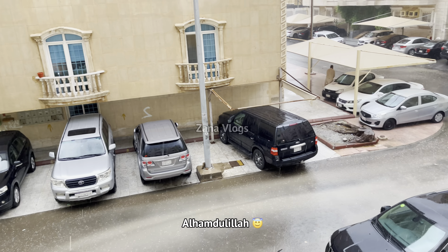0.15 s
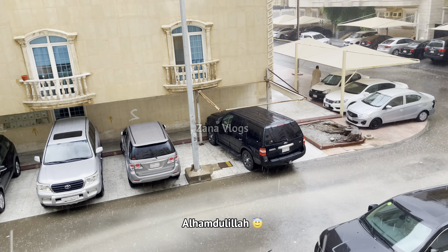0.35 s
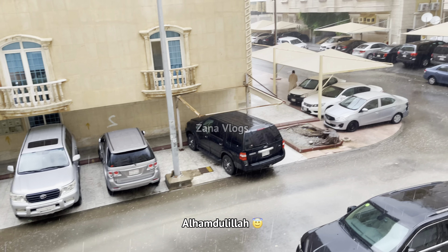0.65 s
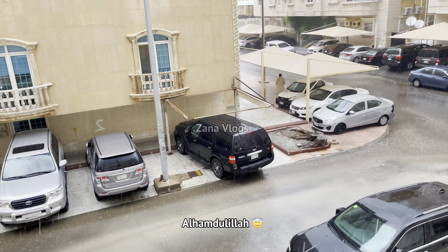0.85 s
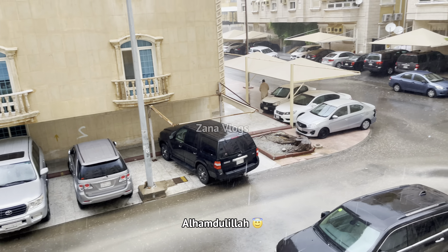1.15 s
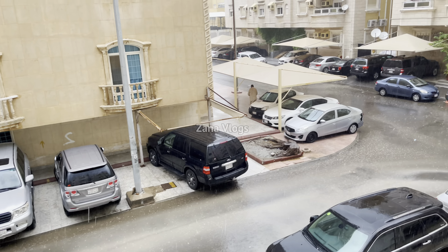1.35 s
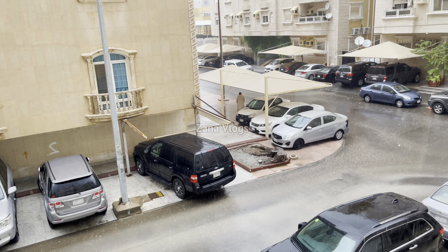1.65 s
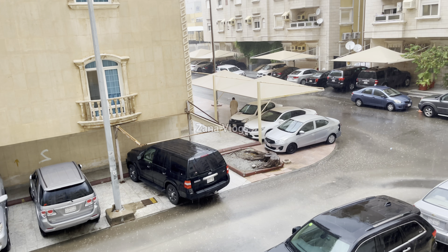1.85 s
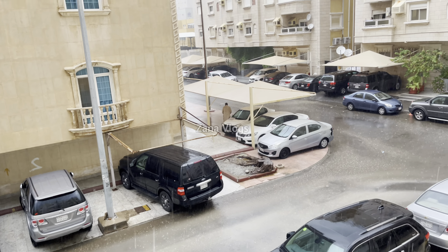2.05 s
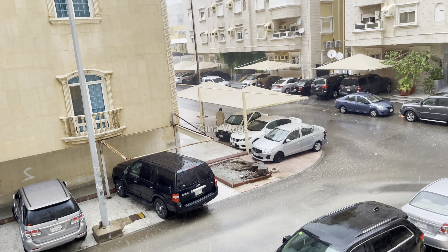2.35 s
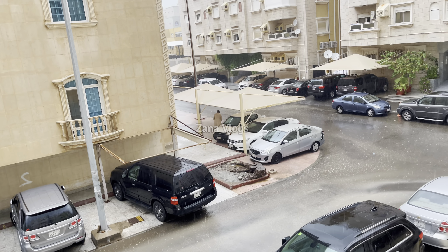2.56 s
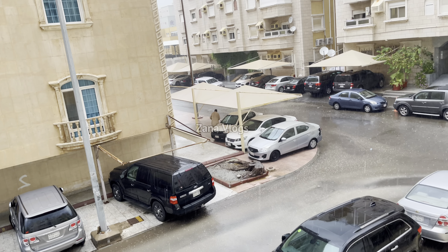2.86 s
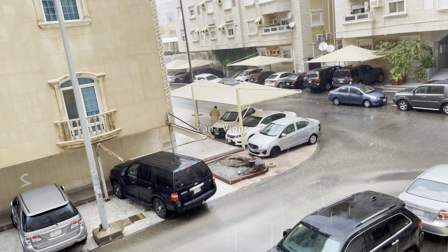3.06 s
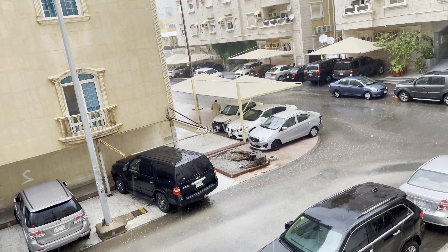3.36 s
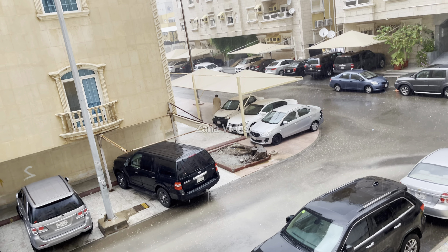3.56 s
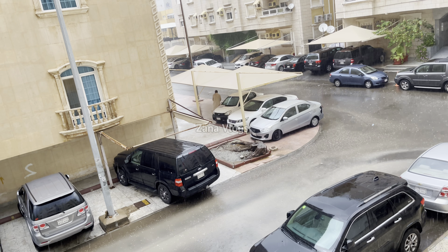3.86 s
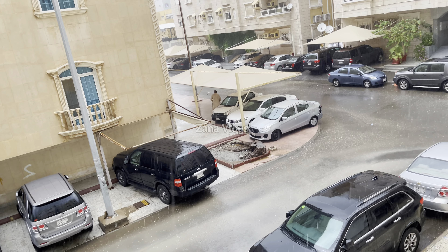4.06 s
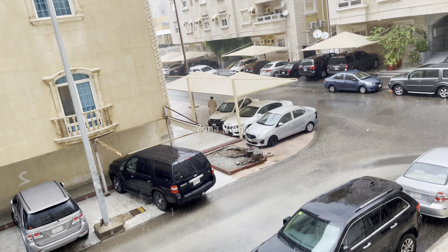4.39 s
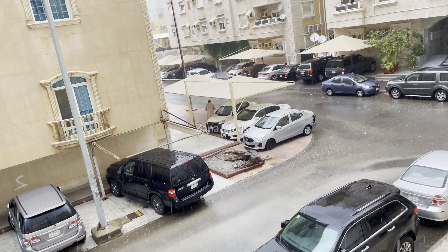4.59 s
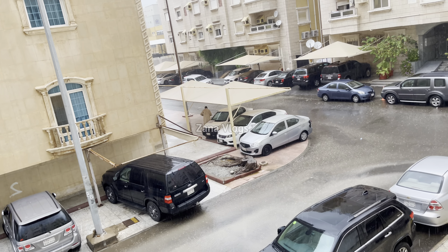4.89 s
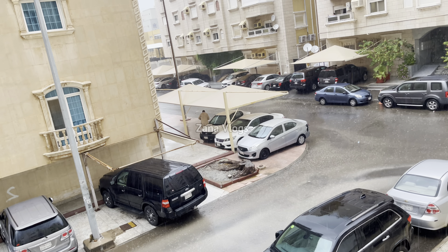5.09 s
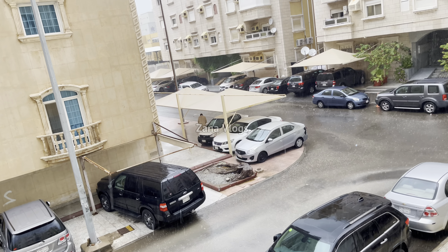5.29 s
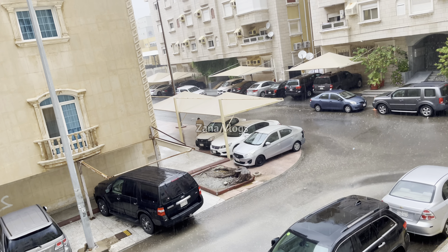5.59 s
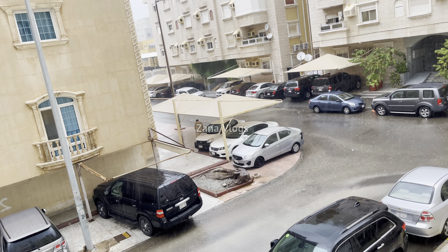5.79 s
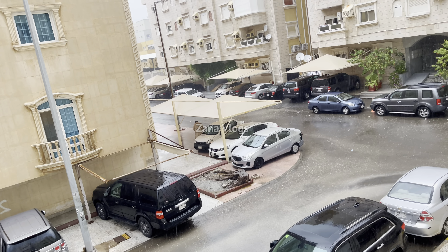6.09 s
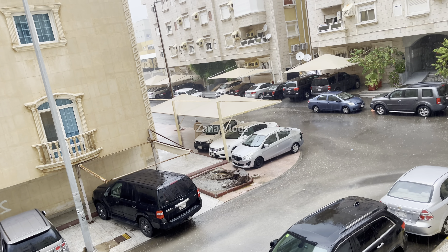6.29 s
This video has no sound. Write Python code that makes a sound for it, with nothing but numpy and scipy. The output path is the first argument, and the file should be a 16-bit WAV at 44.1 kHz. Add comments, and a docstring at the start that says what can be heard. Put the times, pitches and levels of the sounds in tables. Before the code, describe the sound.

Steady rain falls on a street between tall buildings, heard from a window on a small stereo phone microphone. Hiss leans left, bright spatter ticks close on the right, and wash surrounds both. Distant traffic drones underneath with soft low thumps. Past the middle, a deep rumble swells in two quick rolls, then sinks back into the rain.

```python
"""Steady rain on a street between tall houses, heard from a window by a phone with a port at each end.
From the start, drops hiss on the left, spatter brightly close by on the right and wash in from all round:
showers of random clicks, coloured by pitch. Faint short rings dot it and far traffic drones as low noise.
Short low pulses, some only peaks within the rumble, begin in the first second; big drops ring from 1.2 s.
A low noise rumble, faint until then, swells in two rolls at about 3.8 and 4.3 s, then sinks back."""
import sys
import numpy as np
from scipy import signal
from scipy.fft import rfft, irfft, next_fast_len
from scipy.io import wavfile
from scipy.ndimage import uniform_filter1d

SR = 44100
rng = np.random.default_rng(int(sys.argv[2]) if len(sys.argv) > 2 else 0)


def transcribe(u):
    """Save the signal u as a 16-bit wav file named by the first command-line argument.

    u: samples, shape (n,) or (channels, n), limited to [-1, 1]; the rate is SR.
    q: integer samples, one column per channel.
    """
    v = np.clip(np.atleast_2d(u).T, -1, 1)
    q = np.round(v * 32767).astype(np.int16)
    wavfile.write(sys.argv[1], SR, q)


N = 283953
SIZE = next_fast_len(N)
HZ = np.maximum(np.arange(SIZE // 2 + 1) * SR / SIZE, 1)   # pitch of each step of a spectrum


def from_db(db):
    """Turn decibels into a plain gain."""
    return 10 ** (np.asarray(db) / 20)


def rms_one(x):
    """Scale a sound to an average (rms) level of 1."""
    return x / np.sqrt(np.mean(x ** 2) + 1e-20)


def in_time(rows):
    """Draw straight lines between the table's moments, one curve per column."""
    s, *columns = np.transpose(rows)
    return [np.interp(np.arange(N) / SR, s, column) for column in columns]


def in_pitch(rows):
    """Draw straight lines between the table's pitches, on a musical (log) scale."""
    hz, *columns = np.transpose(rows)
    return [np.interp(np.log(HZ), np.log(hz), column) for column in columns]


def drift(rate_hz):
    """Slow chance: noise at every 40th sample through a double one-pole low-pass; spread 1."""
    r = np.exp(-80 * np.pi * rate_hz / SR)
    noise = rng.standard_normal(N // 40 + 2002)
    slow = signal.lfilter([1], [1, -2 * r, r * r], noise)[2000:]   # drop the filter's start
    return np.interp(np.arange(N) / 40, np.arange(len(slow)), rms_one(slow))


def late(ms):
    """Factor that delays a spectrum: a delay turns each pitch's phase."""
    return np.exp(-2j * np.pi * HZ * ms / 1000)


def impacts(per_s, spread_db):
    """Clicks at random moments with uneven sizes and either sign; rms 1."""
    size_db = spread_db * np.minimum(rng.exponential(1, N), 5)
    sizes = from_db(size_db) * rng.choice([-1, 1], N)
    return rms_one(sizes * (rng.random(N) < per_s / SR))


def low_noise(spectrum, alike, left_db, lead_ms, even):
    """Dull noise nearly alike at both ports, left first; even (0-1) steadies its level; rms about 1."""
    common, left, right = rfft(rng.standard_normal((3, N)), SIZE) * from_db(in_pitch(spectrum)[0])
    alike = np.clip(alike, 0, 1)   # share of the power that both ports have in common
    left = np.sqrt(alike) * common + np.sqrt(1 - alike) * left
    right = np.sqrt(alike) * common * late(lead_ms) + np.sqrt(1 - alike) * right
    pair = irfft(np.array([left, right]), SIZE)[:, :N]
    power = uniform_filter1d(np.mean(pair ** 2, axis=0), size=2000)
    power = uniform_filter1d(power, size=2000)
    steadied = rms_one(pair / power ** (even / 2))
    return steadied * from_db([[left_db / 2], [-left_db / 2]])


DRONE_SURGE_DB = 1.43   # size of the random surges
# slow rise and fall of the far traffic, before the surges: t/s, level/dB
DRONE_COURSE = [(0, -34.5), (.6, -37.5), (1.1, -35.5), (1.7, -35.5), (2.3, -36.5), (2.8, -33.5),
                (3.4, -35.5), (5.7, -36.5), (6.44, -34.5)]
# tone colour of the far traffic: f/Hz, level/dB (per Hz, relative)
DRONE_COLOUR = [(15, -52), (25, -30), (36, -14.5), (59, -1), (118, -2), (145, -8.5), (165, -2.5),
                (192, -6.5), (221, -3), (330, -16), (430, -56), (730, -120)]


def traffic_drone():
    """Far traffic blends into low noise whose level wanders slowly."""
    level_db, = in_time(DRONE_COURSE)
    drone = low_noise(DRONE_COLOUR, alike=0.92, left_db=0.5, lead_ms=0.4, even=0.27)
    return from_db(level_db + DRONE_SURGE_DB * drift(3.5)) * drone


ROLL_ATTACK_S, ROLL_RELEASE_S = 0.058, 0.032
ROLL_SAG_DB_PER_S, RUMBLE_BED_DB = 9.5, -39.5
# swells of the rumble: start t/s, length/s, time from start to sag/s, level/dB (before the sag)
RUMBLE_ROLLS = [(3.82, 0.47, .25, -31), (4.307, 1.34, 0.56, -29.5)]


def rolls():
    """Gain of the rumble: a low bed, and over it rolls that set in fast, hold, sag and stop."""
    t, power = np.arange(N) / SR, from_db(RUMBLE_BED_DB) ** 2
    for s, length, hold, level_db in RUMBLE_ROLLS:
        age = t - s
        gate = np.clip(age / ROLL_ATTACK_S, 0, 1) * np.clip((length - age) / ROLL_RELEASE_S, 0, 1)
        sag_db = ROLL_SAG_DB_PER_S * np.maximum(age - hold, 0)
        power = power + (gate * from_db(level_db - sag_db)) ** 2
    return np.sqrt(power)


# tone colour of the rumble: f/Hz, level/dB (per Hz, relative)
RUMBLE_COLOUR = [(15, -53), (25, -25), (40, -31), (52, -4), (85, -0.5), (115, 1), (150, -2.5), (205, -7.5),
                 (255, -14), (290, -26), (330, -19), (430, -35), (730, -120)]


def rumble():
    """Deep noise, evened out in level so that the rolls alone shape its main swells."""
    return rolls() * low_noise(RUMBLE_COLOUR, alike=0.96, left_db=2.2, lead_ms=0.31, even=0.8)


PULSE_CYCLES, PULSE_LEFT_DB, PULSE_LEAD_S = .8, 2, 0.0004   # fade width; left louder; left earlier
# short low pulses, some only peaks within the rumble:
# middle t/s, level/dB (before the fade and the left-right split), f/Hz
LOW_PULSES = [(0.155, -25, 100), (0.242, -21.5, 83), (0.273, -29, 85), (0.41, -21.5, 105),
              (.875, -22.5, 100), (1.806, -29, 110), (2.498, -25, 125), (2.595, -26, 90), (2.95, -23, 105),
              (3.237, -26, 94), (4.075, -27, 85), (4.338, -19, 105), (4.409, -20, 95), (4.486, -18.5, 67.6),
              (4.676, -19, 120), (4.918, -22, 110), (5.009, -23, 95), (5.173, -23, 130), (5.622, -24, 100),
              (6.017, -24.5, 115)]


def low_pulses():
    """Each pulse is a push and a pull of low pressure, about two cycles, first at the left port."""
    out, reach = np.zeros((2, N)), 2000
    t = np.arange(-reach, reach) / SR - np.array([[0], [PULSE_LEAD_S]])
    tilt_db = np.array([[.5], [-.5]]) * PULSE_LEFT_DB
    for s, level_db, hz in LOW_PULSES:
        shape = -np.sin(2 * np.pi * hz * t) * np.exp(-(t * hz / PULSE_CYCLES) ** 2)
        middle = round(s * SR)
        out[:, middle - reach:middle + reach] += from_db(level_db + tilt_db) * shape
    return out


RINGS_DB, RING_CYCLES = -44.5, 310   # level of all together; cycles to fade by 60 dB


def faint_rings():
    """Faint short rings at random moments, each at one of 48 pitches, fading."""
    hits, dealt, out = impacts(900, 2.7), rng.integers(0, 48, N), np.zeros((2, N))
    for k, hz in enumerate(np.geomspace(900, 9000, 48)):
        r, w = from_db(-60 * hz / RING_CYCLES / SR), 2 * np.pi * hz / SR
        struck = hits * (dealt == k) + 1e-18
        ring = signal.lfilter([np.sin(w)], [1, -2 * r * np.cos(w), r * r], struck)
        out[k % 2] += ring
        out[1 - k % 2] += 0.12 * np.roll(ring, 20)   # the far port hears it later and weaker
    return from_db(RINGS_DB) * rms_one(out)


DROP_RISE_S = .0002
# big drops landing near: t/s, level/dB (before rise, fade and left-right split), ring f/Hz,
# cycles to fade by 60 dB, left minus right level/dB
BIG_DROPS = [(1.1762, -22, 6040, 22, 7), (1.1765, -21, 11100, 22, 0), (1.4087, -20, 6550, 22, -3),
             (1.5095, -20, 11100, 22, 0), (1.801, -24, 6540, 22, 7), (3.1574, -17, 11000, 22, 0),
             (3.7958, -24, 4680, 16, 7), (3.7962, -22, 5900, 30, 2), (3.919, -16, 11100, 22, -1),
             (4.4104, -19, 11000, 22, 0), (5.14, -15, 10600, 19, 5), (5.169, -37, 4500, 190, 0),
             (6.168, -21, 10900, 16, 3), (6.2074, -16, 10900, 16, 4), (6.3378, -27, 6100, 34, 14),
             (6.3392, -26, 5100, 25, 11), (6.3408, -25, 6000, 30, 6)]


def drops():
    """Each big drop is a short ring; high ticks reach the right port first, lower ones the left."""
    reach = 1500
    out, t = np.zeros((2, N + reach)), np.arange(reach) / SR
    for s, level_db, hz, cycles, left_db in BIG_DROPS:
        lag = .00034 if hz > 8000 else -.00047   # s by which the left port hears it later
        ports = [(max(lag, 0), left_db / 2), (max(-lag, 0), -left_db / 2)]
        start = round(s * SR)
        for port, (delay, gain_db) in enumerate(ports):
            age = np.maximum(t - delay, 0)
            ring = np.sin(2 * np.pi * hz * age) * np.minimum(age / DROP_RISE_S, 1)
            fading_db = level_db + gain_db - 60 * age * hz / cycles
            out[port, start:start + reach] += ring * from_db(fading_db)
    return out[:, :N]


BANDS = 27
# the shower's ups and downs, in pitch; each column counts only by how far it strays from its own mean: # t/s,
# level/dB near 650 Hz, near 1200 Hz, near 1500 Hz, near 1800 Hz, near 2400 Hz, near 5000 Hz, near 11000 Hz
SHOWER_COURSE = [(0, -43.5, -44.5, -44.5, -43.5, -47, -45.5, -47.5),
                 (.8, -43, -43, -43.5, -45.5, -47, -44.5, -47),
                 (1.4, -41.5, -42, -44.5, -44.5, -46.5, -44, -45.5),
                 (1.9, -44, -42.5, -45.5, -43, -48.5, -44, -47),
                 (2.5, -42, -43.5, -45.5, -46, -46.5, -45, -46.5),
                 (3.1, -43.5, -43.5, -44.5, -45, -48, -45.5, -47),
                 (3.7, -43, -44.5, -43, -46.5, -47.5, -45.5, -46.5),
                 (4.6, -42.5, -45, -43, -48.5, -47, -47, -48),
                 (5.3, -42.5, -44.5, -44.5, -47, -48.5, -45.5, -47.5),
                 (5.9, -42.5, -47.5, -44, -48.5, -46.5, -46.5, -48),
                 (6.44, -44, -46.5, -45.5, -51, -45.5, -46.5, -48.5)]
# pitch that each level column of the shower steers: f/Hz
SHOWER_PITCHES = [650, 1200, 1500, 1800, 2400, 5000, 11000]


def patchy(x, gust_db, flicker_db):
    """Deal each drop to a pitch band swayed by shower, common gust and own random flicker; a spectrum."""
    levels = np.array(in_time(SHOWER_COURSE))
    levels -= levels.mean(axis=1, keepdims=True)
    gust, dealt = gust_db * drift(11.2), rng.integers(0, BANDS, N)
    out = np.zeros(len(HZ), complex)
    centres = np.geomspace(300, 13000, BANDS)
    place = np.interp(np.log(HZ), np.log(centres), np.arange(BANDS))
    for k, centre in enumerate(centres):
        # how much each shower column counts at this band's pitch
        steer = [np.interp(np.log(centre), np.log(SHOWER_PITCHES), row)
                 for row in np.eye(len(SHOWER_PITCHES))]
        mine, hits, near = np.flatnonzero(dealt == k), np.zeros(N), abs(place - k) < 1
        flicker = flicker_db * drift(17.0)[mine] * min(0.17 + k / 18, 1)   # weaker in the low bands
        hits[mine] = x[mine] * from_db(steer @ levels[:, mine] + gust[mine] + flicker)
        overlap = np.sqrt(BANDS * (1 - abs(place[near] - k)))   # neighbouring bands cross-fade
        out[near] += rfft(hits, SIZE)[near] * overlap
    return out


def wash(share):
    """Rain from all round: many drops, drawn afresh for each port."""
    return [np.sqrt(share) * patchy(impacts(44000, 1.03), 0.62, 2.1) for port in "LR"]


# rain from the street: f/Hz, share of power 0-1 (before the top fades), lead of the left port/ms
STREET_RAIN = [(250, 0.71, 0.24), (394, 0.21, 0.47), (570, 0.6, 0.24), (850, 0.54, 0.58),
               (1100, 0.13, 0.39), (1250, 0, 0.33), (1426, 0.08, 0.35), (1560, 0.82, 0.4),
               (1900, 0.52, 0.32), (2400, 0.27, 0.46), (3200, 0.39, .45), (4000, 0.27, 0.46),
               (6100, 0.34, 0.494), (6640, 0.54, 0.492), (6870, 0.02, 0.48), (8960, 0, 0.543)]


def street_hiss():
    """Drops on the wet street reach the left port first; gives share, lead and spectrum."""
    share, lead_ms = in_pitch(STREET_RAIN)
    share = np.clip(share * np.clip(9500 / HZ, 0, 1) ** 20, 0, 1)   # the far street has no top
    return share, lead_ms, np.sqrt(share) * patchy(impacts(44000, 1.65), 0.75, 2.4)


# spatter close by: f/Hz, share of power 0-1 (at most what the street leaves, fading below 1000 Hz),
# lead of the right port/ms
CLOSE_SPATTER = [(1000, .1, .25), (2000, .08, .18), (3700, .14, .2), (6000, .14, .28), (7300, .08, .37),
                 (7700, .42, .378), (8050, .5, .367), (8400, .3, .355), (8800, .86, .341), (9200, .7, .348),
                 (9550, .76, .355), (9720, .97, .36), (10050, .998, .348), (10330, .998, .339),
                 (10750, .9, .336), (11750, .89, .34), (13000, .95, .325)]


def spatter_near(street_share):
    """Bright drops close by reach the right port first; gives share, lead and spectrum."""
    share, lead_ms = in_pitch(CLOSE_SPATTER)
    share = np.clip(share * np.clip(HZ / 1000, 0, 1), 0, 1 - street_share)
    return share, lead_ms, np.sqrt(share) * patchy(impacts(44000, 0.83), 1.0, 0.7)


# tone colour of the whole rain: f/Hz, level/dB (per Hz, before the bass fades),
# left minus right level/dB
RAIN_COLOUR = [(250, -66, -2.5), (348, -66.5, 0.5), (440, -63, 5.5), (520, -65, 3), (660, -66.5, 2),
               (860, -66, 4), (923, -64, 4.5), (1034, -66.0, 4), (1215, -71, 6), (1470, -69.5, 0.5),
               (1600, -72.5, -1), (1800, -73, 0), (2290, -75, -3), (2620, -76, 0), (2780, -75, -2),
               (3400, -77, 0.5), (4070, -78, -1), (5200, -78, 3), (6160, -79.5, 3.5), (6700, -79.5, 3.5),
               (7000, -84.5, 2), (7300, -84, 0), (7750, -82.5, 2), (8150, -82, 0), (8700, -84.0, 2),
               (9540, -79, 0.5), (11100, -76, 1), (11520, -77.5, 1), (12020, -83, -4), (12600, -87.0, 0),
               (12950, -96.5, -2)]


def rain():
    """Two directions reach the ports one after the other; the rest comes from all round."""
    level_db, left_db = in_pitch(RAIN_COLOUR)
    street_share, street_ms, street = street_hiss()
    spatter_share, spatter_ms, spatter = spatter_near(street_share)
    left, right = wash(1 - street_share - spatter_share)
    left = left + street + spatter * late(spatter_ms)
    right = right + street * late(street_ms) + spatter
    colour = from_db(level_db) * np.sqrt(SR / 2) * np.clip(HZ / 280, 0, 1) ** 3   # rain has no bass
    pair = np.array([left * from_db(left_db / 2), right * from_db(-left_db / 2)])
    return irfft(colour * pair, SIZE)[:, :N]


def scene():
    """Add up all layers, from the background to the rain."""
    return traffic_drone() + rumble() + low_pulses() + faint_rings() + drops() + rain()


BASS_CUT_HZ, NARROW_HZ, CUTOFF_HZ = 25, 11700, 13050


def record(dry):
    """The highest treble is nearly alike in both channels; deep bass and top are cut."""
    mid, side = (dry[0] + dry[1]) / 2, (dry[0] - dry[1]) / 2
    narrow = signal.ellip(10, .2, 18, NARROW_HZ, fs=SR, output="sos")
    side = signal.sosfiltfilt(narrow, side)
    bass = signal.butter(2, BASS_CUT_HZ, "high", fs=SR, output="sos")
    top = signal.ellip(10, .3, 70, CUTOFF_HZ, fs=SR, output="sos")
    return signal.sosfilt(np.vstack([bass, top]), np.array([mid + side, mid - side]))


dry = scene()
out = record(dry)
transcribe(out)
```